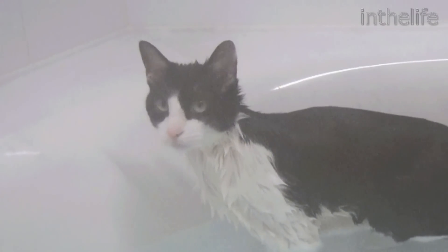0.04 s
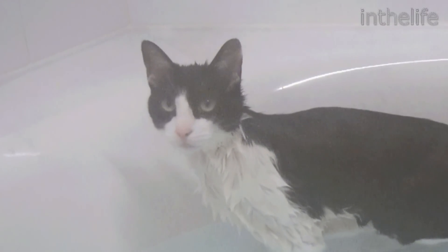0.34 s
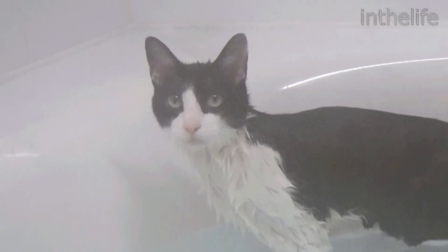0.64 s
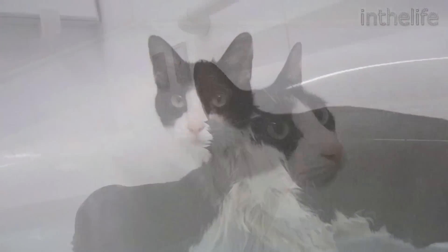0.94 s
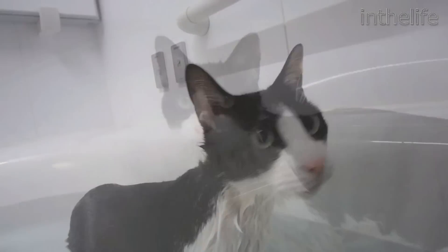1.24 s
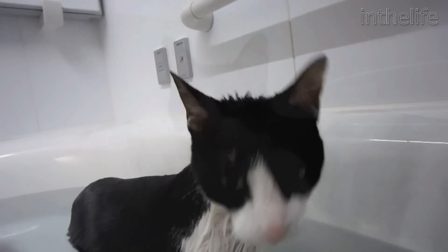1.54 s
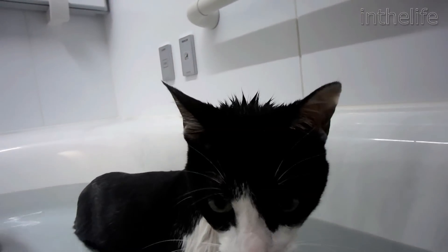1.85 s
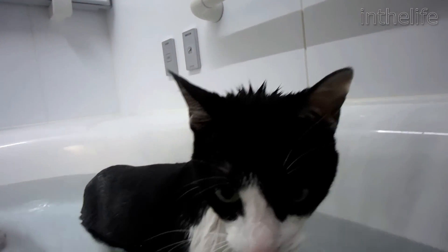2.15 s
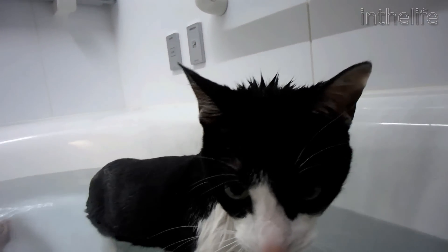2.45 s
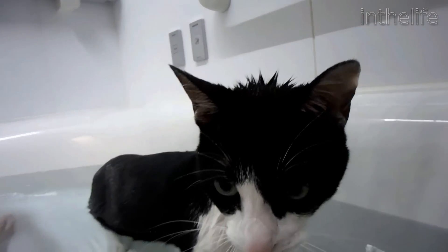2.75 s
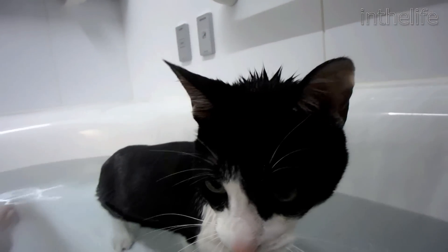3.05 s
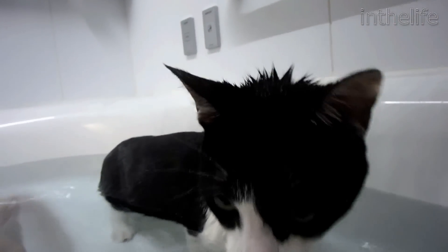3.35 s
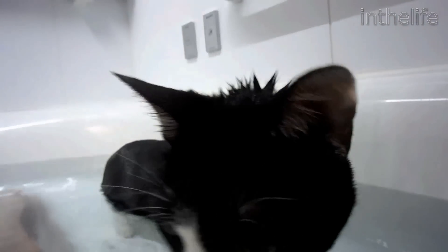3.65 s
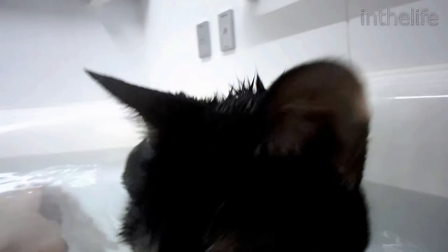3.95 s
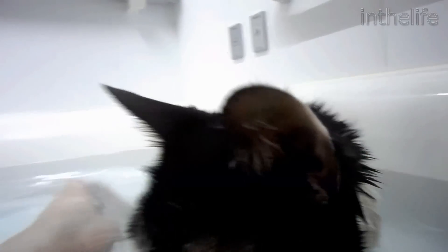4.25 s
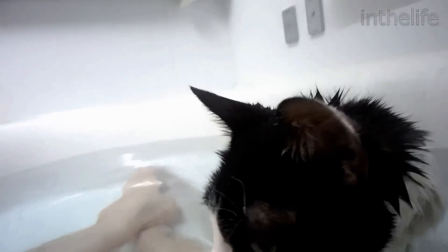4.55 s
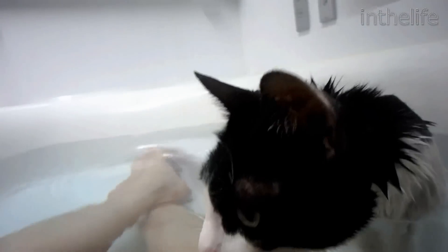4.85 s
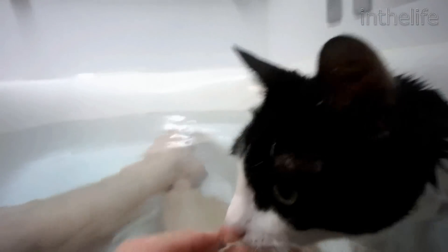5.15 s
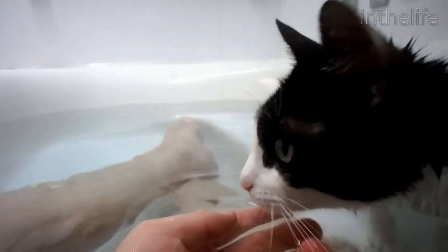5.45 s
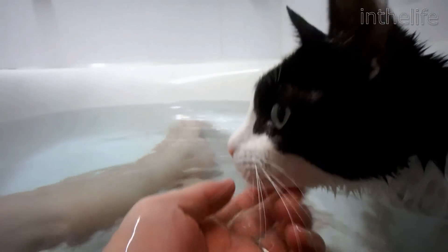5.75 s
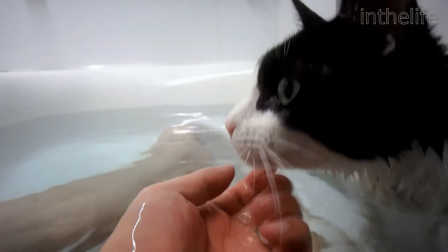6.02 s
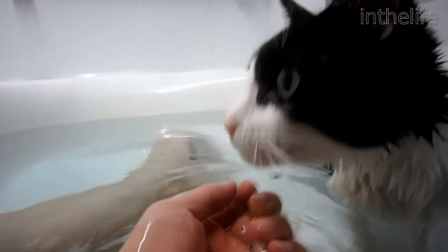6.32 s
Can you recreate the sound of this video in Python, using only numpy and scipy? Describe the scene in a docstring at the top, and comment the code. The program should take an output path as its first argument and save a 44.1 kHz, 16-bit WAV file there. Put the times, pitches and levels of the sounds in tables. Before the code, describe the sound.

Faint room noise and a soft splash come first. Then churning water in a bathtub fades in, humming and bubbling, muffled by the case around a hand-held microphone. A finger rubs and squeaks briefly, followed by scattered hollow knocks and a run of heavy, low thumps as the grip shifts. Toward the end, drips and laps stand out over the continuing drone, with very faint high pips behind.

```python
"""A quiet bathroom and one soft splash are heard first: a cat stands in a bathtub. The room fades over into a
close shot from a hand-held camera in a waterproof case. Steadily churning water forces the case's
resonances into a drone, and bubbles ring as it laps at the tub. Fingers rub, squeak and knock on the case,
which booms near 30 Hz and makes the gain control duck. Faint high pips and hiss lie behind."""
import sys
import numpy as np
from scipy import signal
from scipy.fft import rfft, irfft
from scipy.io import wavfile
from scipy.ndimage import uniform_filter1d

SR = 44100
rng = np.random.default_rng(int(sys.argv[2]) if len(sys.argv) > 2 else 0)


def materialize(psi):
    """Save the field psi as 16-bit PCM at rate SR to the path in sys.argv[1].

    A 1-D psi becomes a single channel; in a 2-D psi each row is a channel.
    """
    bounded = np.clip(np.atleast_2d(psi).T, -1, 1)
    quanta = np.round(bounded * 32767).astype(np.int16)
    wavfile.write(sys.argv[1], SR, quanta)


N = 290178
TIME = np.arange(N) / SR
RING_TIME = TIME[:SR // 3]
FREQS = np.arange(N // 2 + 1) * SR / N

# case resonances driven by the water: centre_hz, width_hz, left_db, right_db, left_lead_rad
CASE_MODES = [(212, 145, -7.5, -20, -.5), (312, 146, -6.5, -9.5, 2.5), (534, 130, -8, -13, 0),
              (634, 118, -5.5, -16, 1.5), (736, 63, 1, -14.5, 0), (835, 322, -7.5, -47, 1.63),
              (1071, 60, -15, -16.5, 0.7), (1482, 276, -19.5, -24, 1), (1632, 193, -16, -18.5, -1.06),
              (2180, 292, -28, -15.5, -1.25), (2837, 490, -23.5, -40, -8), (3244, 287, -19, -24, 3),
              (4580, 830, -36.5, -54.5, 0.57)]
# broadband wash of the water: frequency_hz, density_db
WASH_SPECTRUM = [(100, 2), (450, -14), (900, 6.5), (1300, -20), (2000, 2), (3000, -13), (3800, -23),
                 (4900, -18), (5500, -46), (9000, -52.5)]
# slow surge of the churning: time_s, gain_db
SURGE_CURVE = [(1.4, -41.5), (1.8, -37), (3.1, -37), (3.4, -39), (3.7, -36.5), (3.88, -40.5), (4.05, -38.5),
               (4.35, -38.5), (4.7, -36), (5.25, -35), (5.65, -40), (6.1, -37), (6.45, -36.5)]
def churning_water():
    """Forced vibration: turbulent water drives the case's resonances, while stray bubbles ring freely."""
    drone = from_db(3) * resonate(CASE_MODES, flicker_db=1.5, flicker_hz=17)
    wash = from_db(-9.5) * diffuse(WASH_SPECTRUM)
    bubbles = np.zeros((2, N))
    for when, pitch, faintness, side in rng.random((160, 4)):
        gain = from_db(3 - 20 * faintness) / (1 + pitch)
        ring = bubble(550 * 3.6 ** pitch, cycles=10.7, rise=0.08)
        add(bubbles, when * TIME[-1], gain * ring, pan_db=12 * side - 1)
    surge = from_db(np.interp(TIME, *np.transpose(SURGE_CURVE)))
    return surge * (drone + wash + bubbles)


# drips and laps at the tub: start_s, level_db, pitch_hz
LAP_EVENTS = [(1.341, -54, 886), (1.551, -44, 715), (4.058, -28, 789), (4.77, -37, 800), (5.08, -24, 745),
              (5.186, -25, 947), (5.522, -28.5, 956), (6.054, -26.5, 855), (6.178, -26, 730),
              (6.386, -24.5, 830), (6.415, -23, 776), (6.454, -23.5, 900), (6.482, -23, 770)]
def laps():
    """Air entrainment: each lap traps a ringing bubble and throws a brief spatter."""
    out = np.zeros((2, N))
    for start_s, level_db, pitch_hz in LAP_EVENTS:
        plip = from_db(-1.5) * bubble(pitch_hz, cycles=14.8, rise=0.072)
        spatter = from_db(-12.5) * crack(centre_hz=1180, width_hz=600, t60_s=0.024, top_hz=3220)
        add(out, start_s, from_db(level_db) * (plip + spatter), pan_db=20)
    return out


def bubble(pitch_hz, cycles, rise):
    """Minnaert resonance: a pocket of air pulsates, rising in pitch as it decays 60 dB over `cycles`."""
    turns = pitch_hz * RING_TIME
    envelope = from_db(-60 * turns / cycles) * (1 - np.exp(-2 * turns))
    return envelope * np.sin(2 * np.pi * turns * (1 + rise * turns / cycles))


# low modes of the jolted case: pitch_hz, level_db, t60_s, left_lead_rad
LOW_MODES = [(30.7, 1.5, 0.18, -1.57), (47.3, 1, 0.094, -2.5), (97.3, -13.5, 0.081, -1.36),
             (200.6, -22, 0.1, 3)]
# jolts of the hand: start_s, level_db, pan_db
JOLT_EVENTS = [(1.423, -31, -5), (2.199, -12, 5), (2.602, -18.5, -7), (2.719, -10.5, -2), (3.217, -9, -9.5),
               (3.721, 1, -3.5), (4.177, -0.5, 0.5), (4.277, -5.5, -3), (4.381, -1, -3.5),
               (4.447, -2.5, -1.5), (4.514, -5, -2.5), (4.59, -3, -3.5), (4.659, -11.5, 1),
               (4.763, -16.5, -1), (4.874, -1.5, -3)]
def booms():
    """Impulse response: a soft jolt of the hand sets the case's lowest modes ringing."""
    out = np.zeros((2, N))
    boom = strike(LOW_MODES, contact_hz=150, build_per_cycle=1.71)
    for start_s, level_db, pan_db in JOLT_EVENTS:
        add(out, start_s, from_db(level_db) * boom, pan_db)
    return out


# modes of the knocked case: pitch_hz, level_db, t60_s, left_lead_rad
SHELL_MODES = [(182, -4.5, 0.13, 0.4), (273, 7.5, 0.052, 2), (532, -2.5, 0.058, -1.5),
               (611, 6, 0.038, -1.6), (729, -2.5, 0.067, 2), (843, -2, 0.096, 4), (1550, -22, 0.0094, -5),
               (2100, -20, 0.03, 0)]
# knocks on the case: start_s, ring_db, pan_db, contact_hz, crack_db, crack_top_hz
KNOCK_EVENTS = [(1.776, -29.5, 5.5, 1800, -34, 1830), (2.121, -23.5, 6.5, 160, -58, 2000),
                (2.318, -15.5, 4, 900, -35, 2850), (2.717, -16, 9.5, 1500, -28, 2200),
                (2.895, -18, -12, 2500, -19, 2470), (3.212, -10, 2, 1400, -33, 2800),
                (3.24, -21, 4, 300, -47, 2800), (3.722, -17, 9, 220, -39, 2000),
                (4.515, -29, 18, 4000, -24, 2540), (4.913, -7, 6, 497, -21.5, 3200)]
def knocks():
    """Impact excitation: the contact cracks and the case rings, brighter for a harder touch."""
    out = np.zeros((2, N))
    for start_s, ring_db, pan_db, contact_hz, crack_db, top_hz in KNOCK_EVENTS:
        ring = from_db(ring_db) * strike(SHELL_MODES, contact_hz, build_per_cycle=2.7)
        contact = from_db(crack_db) * crack(centre_hz=1580, width_hz=1200, t60_s=0.017, top_hz=top_hz)
        add(out, start_s, ring + contact, pan_db)
    return out


# the hand shifts its grip: start_s, length_s, level_db
GRIP_SHIFTS = [(2.15, 0.32, -15.5), (2.64, 0.38, -18), (3.17, 0.22, -19), (3.4, 0.48, -24),
               (4.22, 1, -20.5), (5.0, 0.23, -22)]
# slow sway of the held case: centre_hz, width_hz, left_db, right_db, left_lead_rad
SWAY_MODES = [(32.1, 10.9, -0.5, 3, -1.73)]
# rumble of the held case: centre_hz, width_hz, left_db, right_db, left_lead_rad
RUMBLE_MODES = [(64.7, 68, -0.5, -0.3, -2), (105.5, 42, 2, -0.75, -2)]
def handling(presence, shifting):
    """Structure-borne sound: the case sways and rumbles in the hand, more so as the grip shifts."""
    tremor = from_db(-28)   # sway of the hand at rest
    motion = 1 + shifting / tremor
    sway = resonate(SWAY_MODES, flicker_db=5, flicker_hz=4.6)
    sway_power = uniform_filter1d(np.mean(sway ** 2, axis=0), size=3000)
    sway /= np.sqrt(sway_power + 0.21)   # evened out, so the grip sets its strength
    rumble = resonate(RUMBLE_MODES, flicker_db=1, flicker_hz=11)
    rumble += from_db(-3.5) * diffuse([(25, -18), (60, 5), (120, -7), (220, -25.5), (600, -80)])
    return presence * (tremor * motion * sway + from_db(-33) * motion ** 0.41 * rumble)


# case resonances driven by a finger: centre_hz, width_hz, left_db, right_db, left_lead_rad
RUB_MODES = [(178, 98, 0.5, 1, -0.5), (326, 115, 4, -2, 3.5), (601, 39, 5.5, -1, 1),
             (818, 158, -0.5, -12.5, 0.2), (1600, 280, -22, -21, 1.5), (2266, 260, -18.5, -10, -1.15),
             (3120, 420, -24.5, -32.5, 4.5)]
# strokes of a finger over the case: start_s, length_s, level_db
FINGER_STROKES = [(1.18, 0.12, -54.5), (2.11, 0.037, -45), (2.13, 0.29, -45), (2.3, 0.18, -21.5),
                  (2.575, 0.16, -26.5)]
def rubbing(shifting):
    """Sliding friction: finger strokes and, more faintly, shifts of the grip drive the case with noise."""
    pressure = gestures(FINGER_STROKES, peak_share=0.62) + from_db(-24) * shifting
    return pressure * resonate(RUB_MODES, flicker_db=-0.5, flicker_hz=40)


# partials of a squeak: harmonic_number, level_db
SQUEAK_HARMONICS = [(1, 0.5), (3, -28), (4, -45), (6, -42)]
# slips of a wet finger: start_s, length_s, pitch_hz, level_db
FINGER_SLIPS = [(2.242, 0.014, 548, -23), (2.634, 0.024, 557, -17), (2.656, 0.017, 603, -15),
                (2.674, 0.014, 556, -10), (2.693, .025, 579, -14), (2.706, 0.058, 565, -27.5)]
def squeaks():
    """Stick-slip oscillation: a wet finger catches and lets go, giving short, rough tones."""
    out = np.zeros((2, N))
    tremble = drift(230)
    for start_s, length_s, pitch_hz, level_db in FINGER_SLIPS:
        t = TIME[:int(length_s * SR)]
        wobble = tremble[int(start_s * SR):][:len(t)]
        phase = 2 * np.pi * pitch_hz * t + 0.37 * wobble
        tone = sum(from_db(db) * np.sin(k * phase) for k, db in SQUEAK_HARMONICS)
        envelope = from_db(level_db + 1.7 * wobble) * np.sin(np.pi * t / length_s)
        add(out, start_s, envelope * tone, pan_db=7.5)
    return out


# background of the open bathroom: frequency_hz, density_db
ROOM_SPECTRUM = [(15, -21), (25, -1.5), (130, 1), (165, 1), (225, -5.5), (305, -3), (400, -7.5),
                 (572, -10.5), (1030, -14), (2030, -20), (2390, -15), (2960, -20), (3490, -19),
                 (4700, -24.5), (5370, -29), (13400, -28), (15800, -31)]
def bathroom():
    """Diffuse field: steady room noise, and one soft splash that rises quickly and trickles away."""
    start_s, attack_s, t60_s = 0.565, 0.015, 0.63
    decay_db = 60 * np.maximum(TIME - start_s, 0) / t60_s
    envelope = ramp(start_s, attack_s) * from_db(-51 - decay_db + 3.2 * drift(49))
    splash = envelope * diffuse([(200, -13), (700, 4), (2000, 2), (6000, -10), (12000, -30)])
    return from_db(-46.5) * diffuse(ROOM_SPECTRUM) + splash


# faint double ticks: start_s, level_db
DOUBLE_TICKS = [(2.775, -58), (3.41, -57), (3.81, -57), (3.945, -61), (5.715, -56), (6.245, -56)]
# runs of evenly spaced pips: start_s, length_s, level_db
PIP_TRAINS = [(4.378, .47, -69), (5.04, .6, -65), (6.047, .2, -65)]
def pips():
    """Tone bursts: lone double ticks and runs of thin, high pips come and go on the left."""
    out = np.zeros((2, N))
    for start_s, level_db in DOUBLE_TICKS:
        for delay_s, pitch_hz in [(0, 4040), (0.03, 4120)]:
            tick = pip(pitch_hz, length_s=0.013, waver_rad=3)
            add(out, start_s + delay_s, from_db(level_db) * tick, pan_db=5)
    for start_s, length_s, level_db in PIP_TRAINS:
        for onset_s in np.arange(start_s, start_s + length_s, 0.1335):
            add(out, onset_s, from_db(level_db) * pip(7170, length_s=0.042, waver_rad=5), pan_db=9)
    return out


def pip(pitch_hz, length_s, waver_rad):
    """Phase modulation: a random walk makes a short tone waver as it swells and fades."""
    t = TIME[:int(length_s * SR)]
    wander = waver_rad * np.cumsum(rng.standard_normal(len(t))) / np.sqrt(len(t))
    return np.sin(np.pi * t / length_s) * np.sin(2 * np.pi * pitch_hz * t + wander)


# hiss of the close shot: frequency_hz, density_db
HISS_SPECTRUM = [(100, 12), (5000, -5.5), (6500, -2), (8000, -0.5), (10500, 2.5), (13000, 2.5),
                 (15500, -0.5)]
def hiss():
    """Noise floor: a steady hiss, with slight crosstalk between the channels."""
    noise = from_db(-57.5) * diffuse(HISS_SPECTRUM)
    return noise + 0.086 * noise[::-1]


def resonate(modes, flicker_db, flicker_hz):
    """Resonance: surging noise drives each mode, heard at each microphone with its own level and phase."""
    spectrum, shared = 0, drift(flicker_hz)
    for hz, width_hz, left_db, right_db, lead_rad in modes:
        flicker = (shared + drift(flicker_hz)) / np.sqrt(2)
        drive = rng.standard_normal(N) * from_db(flicker_db * flicker)
        response = 1 / (1 + 1j * (FREQS ** 2 - hz ** 2) / (width_hz * FREQS + 1e-9)) ** 2
        pickup = from_db([[left_db], [right_db]]) * np.exp([[0], [-1j * lead_rad]])
        spectrum = spectrum + pickup * rfft(drive) * response
    return unit_rms(irfft(spectrum, N))


def strike(modes, contact_hz, build_per_cycle):
    """Damped free vibration: modes build up and decay, peak 1; a soft contact spares the high ones."""
    t, out = RING_TIME, 0
    for k, (hz, level_db, t60_s, lead_rad) in enumerate(modes):
        onset = (1 - np.exp(-build_per_cycle * hz * t)) ** 2
        decay = from_db(level_db - 60 * t / t60_s)
        excitation = (-1) ** (k // 2) / np.hypot(1, hz / contact_hz)
        phase = 2 * np.pi * hz * t + [[lead_rad / 2], [-lead_rad / 2]]
        out = out + excitation * onset * decay * np.sin(phase)
    return out / np.abs(out).max()


def crack(centre_hz, width_hz, t60_s, top_hz):
    """Transient: a dying burst of band noise with peak 1, muffled by the case."""
    burst = rng.standard_normal(len(RING_TIME)) * from_db(-60 * RING_TIME / t60_s)
    band = signal.lfilter(*signal.iirpeak(centre_hz, centre_hz / width_hz, fs=SR), burst)
    muffled = signal.sosfilt(signal.butter(6, top_hz, fs=SR, output="sos"), band)
    return muffled / np.abs(muffled).max()


def diffuse(spectrum):
    """Incoherent noise: one colour, unrelated at the two microphones, with rms 1."""
    hz, db = np.transpose(spectrum)
    gain = from_db(np.interp(np.log(FREQS + 1), np.log(hz), db))
    return unit_rms(irfft(rfft(rng.standard_normal((2, N))) * gain, N))


def gestures(rows, peak_share):
    """Summed envelopes: each movement swells for `peak_share` of its length, then eases off."""
    strength = 0
    for start_s, length_s, level_db in rows:
        triangle = np.interp(ramp(start_s, length_s), [0, peak_share, 1], [0, 1, 0])
        strength = strength + from_db(level_db) * np.sin(np.pi / 2 * triangle) ** 2
    return strength


def drift(rate_hz):
    """Random fluctuation: low-passed noise with rms 1."""
    return unit_rms(irfft(rfft(rng.standard_normal(N)) / (1 + (FREQS / rate_hz) ** 4), N))


def add(out, start_s, sound, pan_db):
    """Superposition: mix a sound into the track, panned by a left-minus-right level."""
    i = int(start_s * SR)
    part = sound[..., :N - i]
    out[:, i:i + part.shape[-1]] += from_db([[pan_db / 2], [-pan_db / 2]]) * part


def ramp(start_s, length_s):
    """Linear rise from 0 to 1."""
    return np.clip((TIME - start_s) / length_s, 0, 1)


def from_db(db):
    """Decibels to amplitude ratio."""
    return 10 ** (np.asarray(db) / 20)


def unit_rms(x):
    """Normalisation to rms 1."""
    return x / np.sqrt(np.mean(x ** 2) + 1e-20)


def scene():
    """Crossfade: the open room fades out evenly as the close shot swells in along a power curve."""
    room = 1 - ramp(start_s=0.81, length_s=0.9)
    close = ramp(start_s=0.76, length_s=1.934) ** 1.57
    shifting = gestures(GRIP_SHIFTS, peak_share=0.32)
    water = close * churning_water() + laps()
    hand = booms() + knocks() + handling(close, shifting) + rubbing(shifting) + squeaks()
    return water + hand + room * bathroom() + pips() + close * hiss()


def gain_control(x, threshold_db, attack_s, recovery_db_per_s):
    """Automatic gain control: peaks over the threshold pull the gain down, and it creeps back."""
    level_db = 20 * np.log10(np.abs(x).max(axis=0) + 1e-9)
    excess_db = np.maximum(level_db - threshold_db, 0)
    recovered_db = recovery_db_per_s * TIME
    cut_db = np.maximum.accumulate(excess_db + recovered_db) - recovered_db
    pole = np.exp(-1 / (attack_s * SR))
    return x * from_db(-signal.lfilter([1 - pole], [1, -pole], cut_db))


# the camera's narrow notch filters: centre_hz
CAMERA_NOTCHES = [2001, 3010, 3970, 5470, 6170]
def record(dry):
    """Compression and filtering: the camera's gain control, narrow notches and steep top cut."""
    notch_width_hz, cutoff_hz = 70, 15650
    x = gain_control(dry, threshold_db=-3.5, attack_s=0.004, recovery_db_per_s=10)
    for centre_hz in CAMERA_NOTCHES:
        x = signal.lfilter(*signal.iirnotch(centre_hz, centre_hz / notch_width_hz, fs=SR), x)
    return signal.sosfilt(signal.ellip(10, 0.1, 80, cutoff_hz, fs=SR, output="sos"), x)


dry = scene()
out = record(dry)
materialize(out)
```